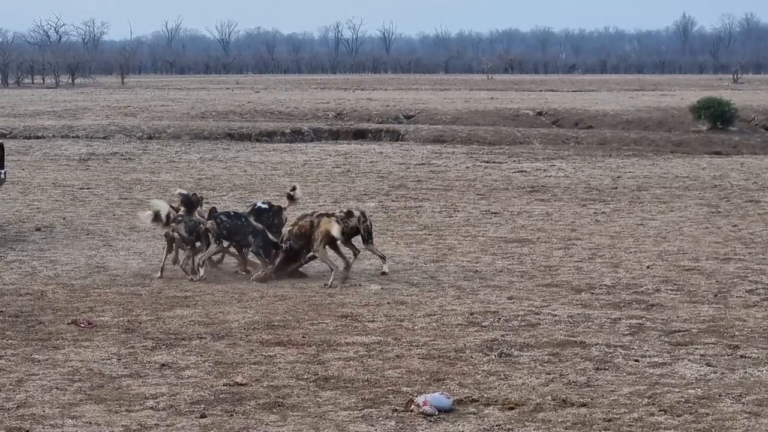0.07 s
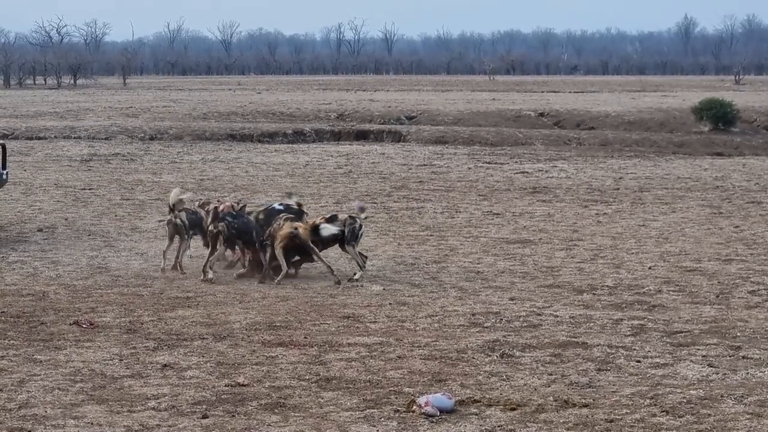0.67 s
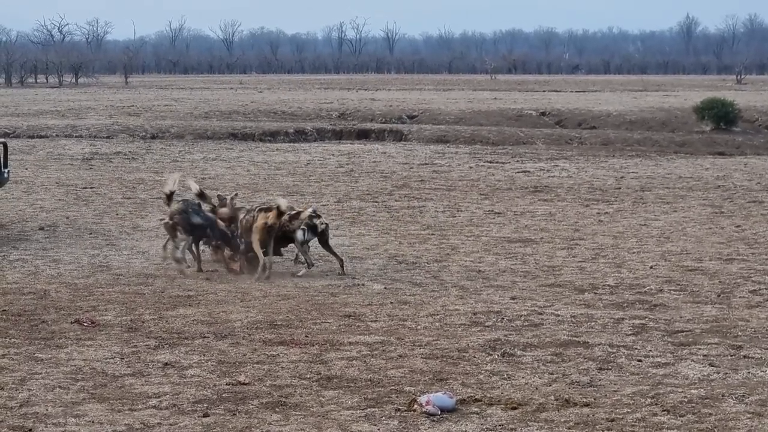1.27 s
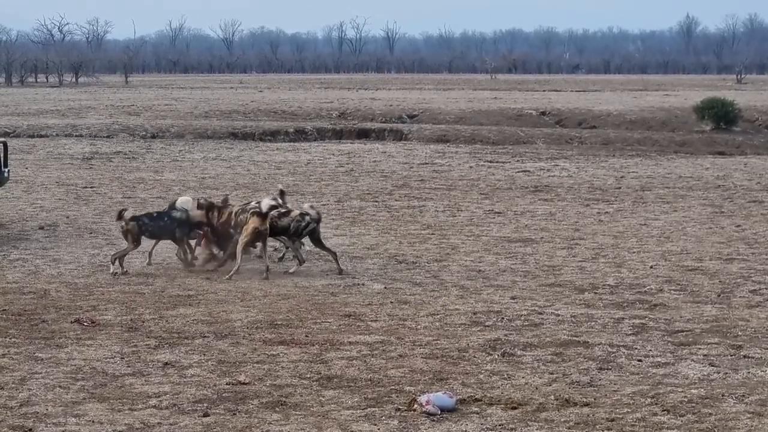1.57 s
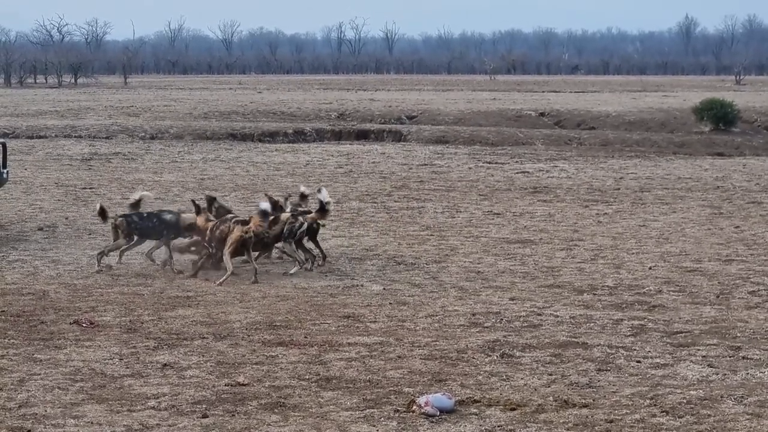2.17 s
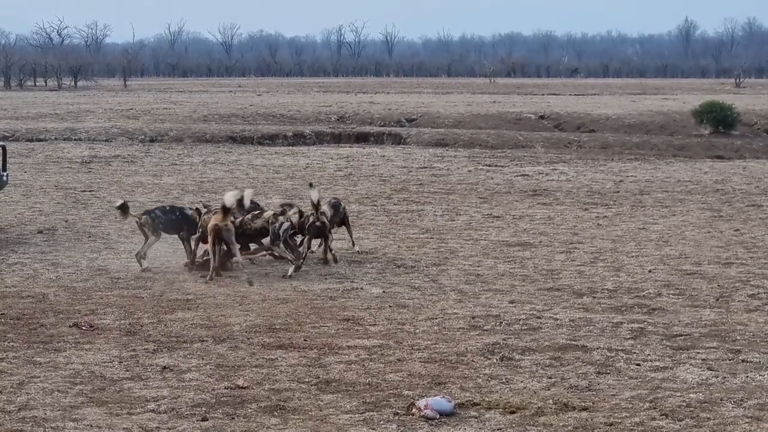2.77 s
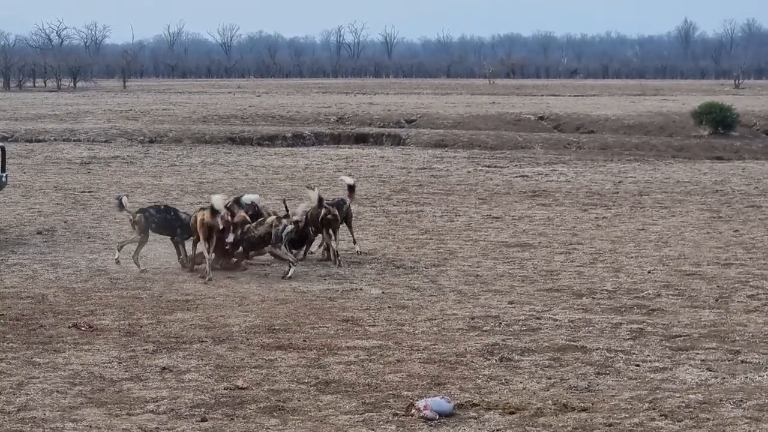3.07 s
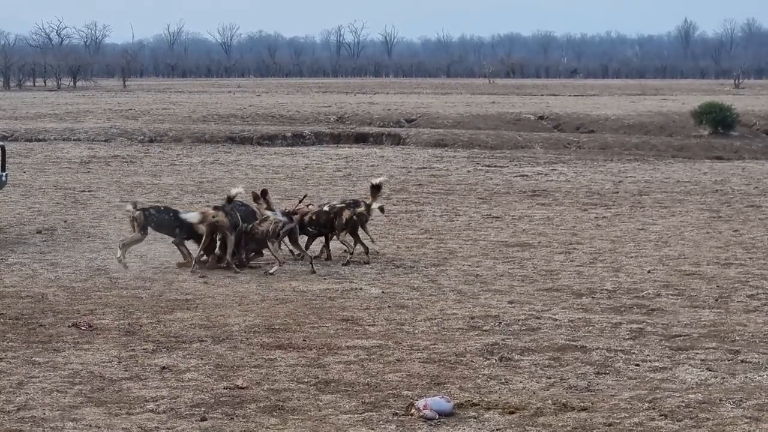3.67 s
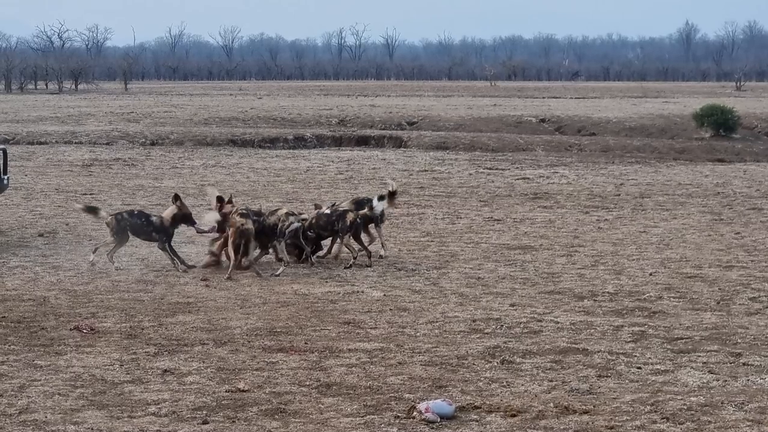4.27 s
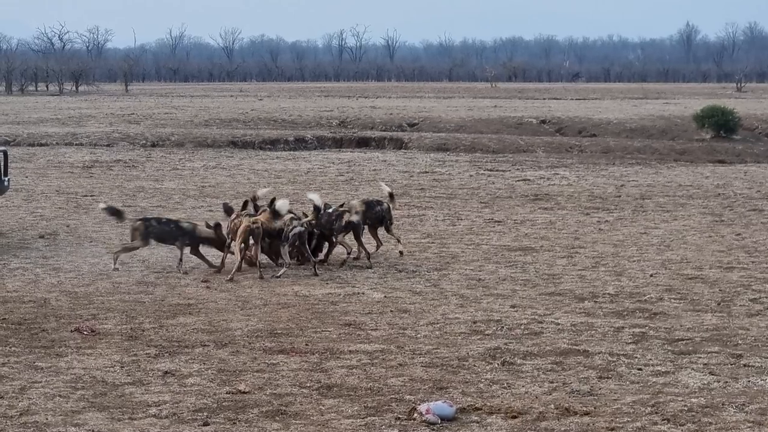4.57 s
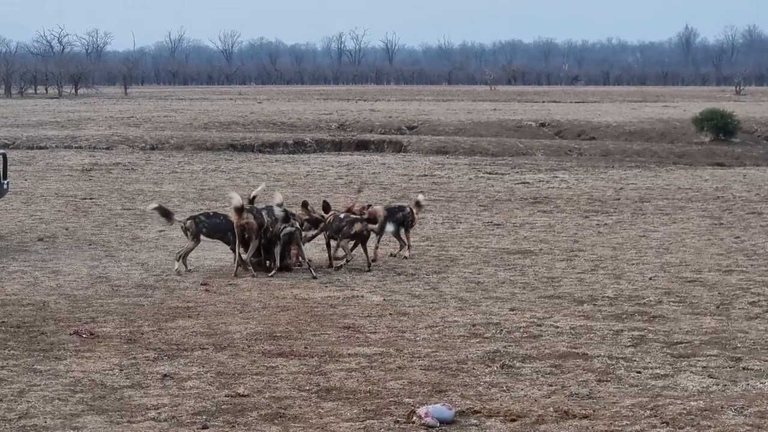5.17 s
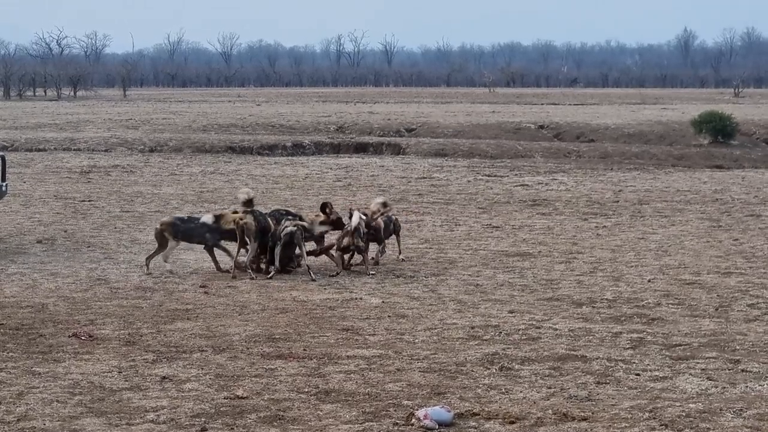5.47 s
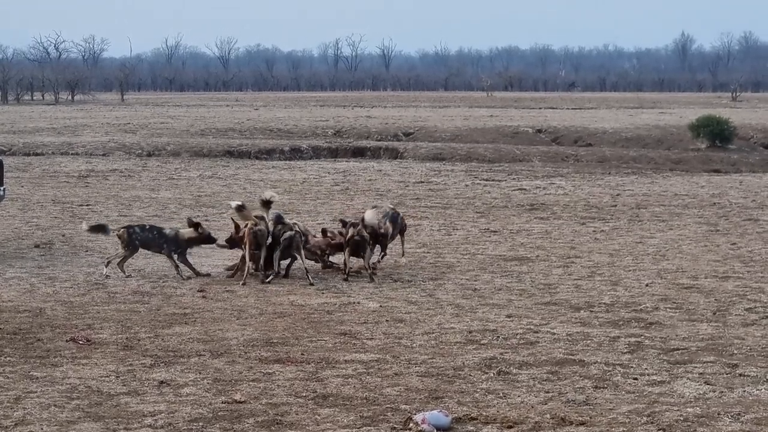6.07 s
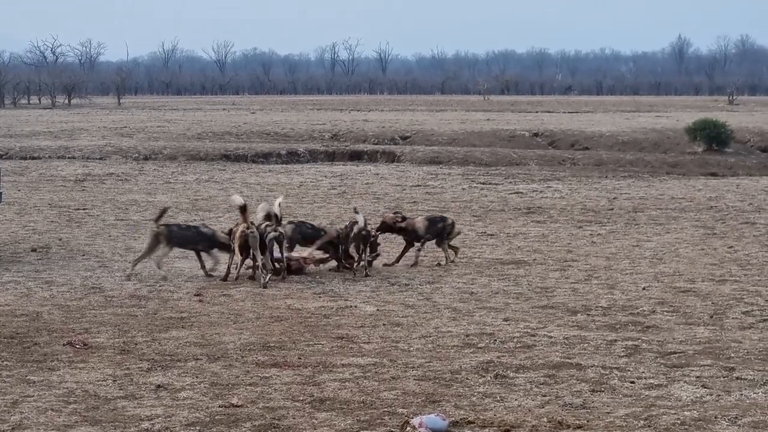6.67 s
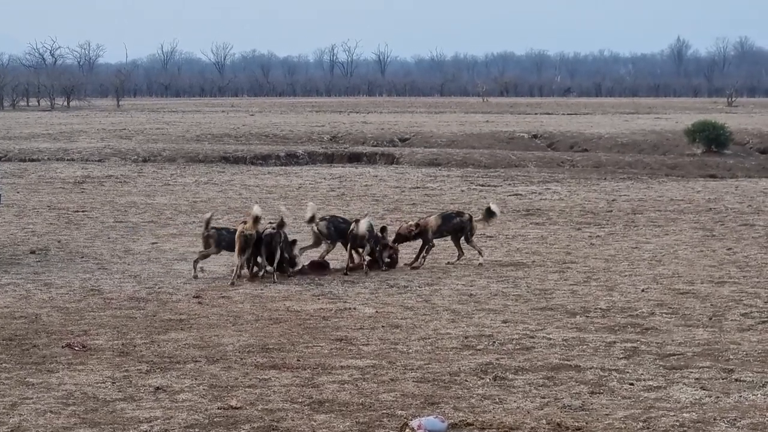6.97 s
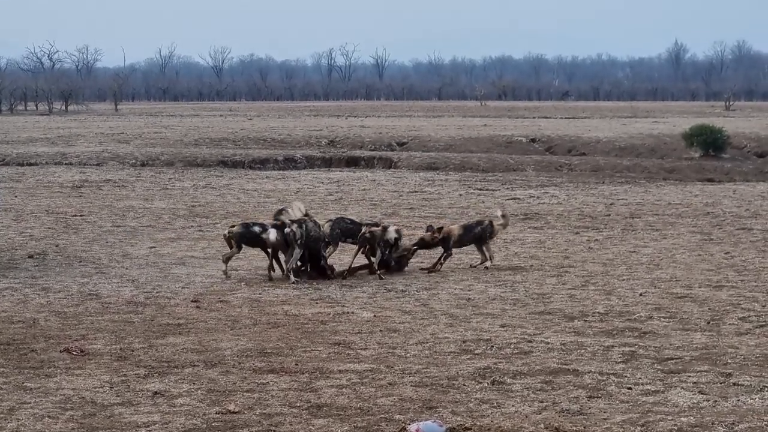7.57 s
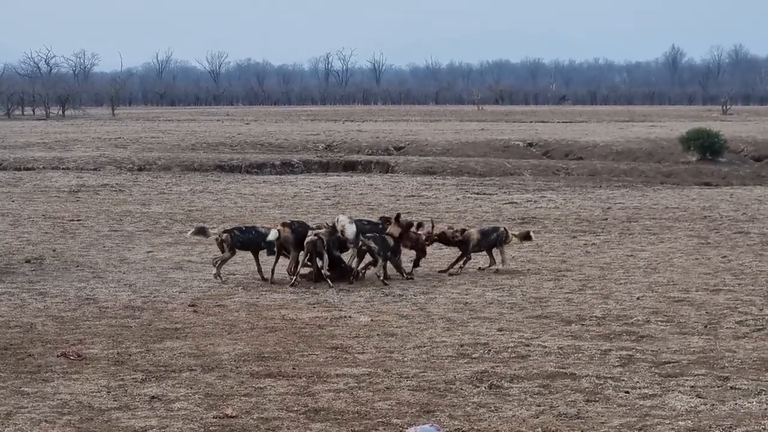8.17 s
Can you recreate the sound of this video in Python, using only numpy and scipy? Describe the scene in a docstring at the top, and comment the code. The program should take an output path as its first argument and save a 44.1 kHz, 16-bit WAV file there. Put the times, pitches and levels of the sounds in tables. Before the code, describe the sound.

A pack of wild dogs feeds some way off on open grassland, giving quick bursts of very high, birdlike twittering. A loud, thin squeal stands out early, with another near the middle and a brief one toward the end. Underneath, paws scuff and thud in dry grass, jaws snap and stalks crack faintly. Light wind rumbles on the microphone, gusting a little more at the close.

```python
"""Wild dogs at a carcass.

A pack tugs at a carcass on dry open grassland, some way off. Thin vibrating membranes give
near-sine voices: fast twittering swoops, arched squeals, hoarse yips, faint moans.
Jaws snap, paws thud, scuff and rasp in the straw, stalks crack. Light wind rumbles on the microphone."""
import sys
import numpy as np
from scipy import signal
from scipy.fft import rfft, irfft
from scipy.io import wavfile
from scipy.ndimage import uniform_filter1d

SR = 44100
rng = np.random.default_rng(int(sys.argv[2]) if len(sys.argv) > 2 else 0)


def log_audio(samples):
    """Write samples as a 16-bit WAV file to the path given in sys.argv[1]."""
    # one column per channel
    frames = np.atleast_2d(samples).T
    # limit to full scale, then quantise
    limited = np.clip(frames, -1, 1)
    pcm = np.round(limited * 32767).astype(np.int16)
    wavfile.write(sys.argv[1], SR, pcm)


N = 367353
TIME_S = np.arange(N) / SR
CUTOFF_HZ = 15850


def from_db(db):
    """Decibels to gain."""
    return 10 ** (np.asarray(db) / 20)


def unit_rms(x):
    """Scale to unit power."""
    return x / np.sqrt(np.mean(x ** 2) + 1e-20)


def in_time(rows, t=TIME_S):
    """Columns of a curve at times t."""
    times, *columns = np.transpose(rows)
    return [np.interp(t, times, column) for column in columns]


def at_hz(points, hz):
    """Interpolate a spectrum over log frequency."""
    points_hz, values = np.transpose(points)
    return np.interp(np.log(hz), np.log(points_hz), values)


def add(track, start_s, sound):
    """Mix a sound into a track from start_s on."""
    i = max(0, int(start_s * SR))
    track[i:i + len(sound)] += sound[:N - i]


def drift(rate_hz, size=N):
    """Smooth random curve of unit spread."""
    knots = rng.standard_normal(size // 20 + 2)
    return np.interp(np.arange(size) * rate_hz / SR, np.arange(len(knots)), knots) * np.sqrt(3 / 2)


def resonate(x, hz, *widths_hz):
    """Unity-peak resonators in series, one per width."""
    for width_hz in widths_hz:
        r = np.exp(-np.pi * width_hz / SR)
        feedback = [1, -2 * r * np.cos(2 * np.pi * hz / SR), r * r]
        x = signal.lfilter(np.array([1, 0, -1]) * (1 - r * r) / 2, feedback, x + 1e-18)
    return x


def swells(rows, bed_db, steepness):
    """Level/dB of a bed plus rounded swells (centre/s, length/s, level/dB)."""
    power = from_db(bed_db) ** 2 + np.zeros(N)
    for centre_s, length_s, db in rows:
        t = np.arange(-min(centre_s, 2 * length_s), 2 * length_s, 1 / SR)
        add(power, centre_s + t[0], from_db(db) ** 2 * np.exp(-np.abs(2 * t / length_s) ** steepness))
    return 10 * np.log10(power)


def place(x, pan_db, lead_ms):
    """Off-centre source; positive values make the left louder and earlier."""
    hz = np.arange(N + 1) * SR / (2 * N)
    left = irfft(rfft(x, 2 * N) * np.exp(2j * np.pi * hz * lead_ms / 1000))[:N]
    return np.array([left, x]) * from_db([[pan_db / 2], [-pan_db / 2]])


def field(x, scatter_db, decay_s, far_db, far_decay_s=.16):
    """Rough ground scatters a brief diffuse tail, the plain a faint long one."""
    t = np.arange(0, .6, 1 / SR)
    decays_s = np.array([[[decay_s]], [[far_decay_s]]])
    tails = rng.standard_normal((2, 2, len(t))) * np.exp(-t / decays_s) * (t > .002)
    near, far = tails / np.sqrt(np.sum(tails ** 2, axis=-1, keepdims=True))
    return x + signal.fftconvolve(x, from_db(scatter_db) * near + from_db(far_db) * far, axes=1)[:, :N]


def echoed(x, delay_s=.002333, echo_db=-18.5):
    """One surface near the microphone combs the spectrum."""
    echo = np.array([np.interp(TIME_S - delay_s, TIME_S, side, left=0) for side in x])
    return x + from_db(echo_db) * echo


# Surroundings: f/Hz, width/Hz, gain/dB
REFLECTION_BANDS = [(541, 58, 6), (1578, 111, -9.5), (1882, 130, -14), (4150, 310, 4)]

def coloured(x):
    """Nearby reflections add peaks and dips."""
    for hz, width_hz, db in REFLECTION_BANDS:
        x = x + (from_db(db) - 1) * resonate(x, hz, width_hz)
    return x


# Stereo field: f/Hz, left-right correlation/1
COHERENCE = [(60, 0.79), (500, 0.91), (1400, 0.034), (10000, 0.051)]

def banded_noise(spectrum, flicker_db, flicker_hz, coherence=COHERENCE):
    """Unit-rms stereo noise in half-octave bands that flicker partly together."""
    out, shared = 0, drift(flicker_hz)
    edges_hz = 20 * 2 ** np.arange(0, 10.1, .5)
    white = rng.standard_normal((2, 2, N))
    for k, (low, high) in enumerate(zip(edges_hz, edges_hz[1:])):
        hz, own = np.sqrt(low * high), drift(flicker_hz)
        if high < spectrum[0][0] or low > spectrum[-1][0]:
            continue
        band = signal.butter(2, [low, high], "band", fs=SR, output="sos")
        mid, side = signal.sosfilt(band, white[k % 2])
        alike = at_hz(coherence, hz)
        gain = from_db(at_hz(spectrum, hz) + flicker_db * (shared + .42 * own))
        out = out + gain * (np.sqrt(1 + alike) * mid + np.sqrt(1 - alike) * side * [[1], [-1]])
    return unit_rms(out)


# Ambient air: f/Hz, relative density/dB
AIR_SPECTRUM = [(25, -25), (50, 2), (80, -12), (160, -24.5), (1200, -29), (2500, -28.5), (4400, -34),
                (7500, -41), (9500, -54)]

def air():
    """Faint hush of still air all round."""
    spectrum = AIR_SPECTRUM + [(CUTOFF_HZ, AIR_SPECTRUM[-1][1])]
    return from_db(-58) * banded_noise(spectrum, flicker_db=2, flicker_hz=18)


# Rumble: f/Hz, relative density/dB
WIND_SPECTRUM = [(22, -1.5), (50, 0), (74, 10), (100, -6.5), (135, -30), (230, -27.5), (330, -61)]
# Breeze: t/s, relative level/dB
BREEZE_CURVE = [(0, -68), (1.1, -62), (1.7, -42.5), (4.0, -43.5), (8.33, -51)]
# Gusts: centre/s, length/s, relative level/dB
WIND_GUSTS = [(1.2, 0.056, -34.5), (1.79, 0.053, -29.5), (1.99, 0.059, -30.5), (2.75, 0.86, -40.5),
              (3.47, 0.17, -36.5), (4.35, 0.18, -36), (6.79, 0.028, -33), (7.21, 0.046, -32.5),
              (7.87, 0.19, -34.5), (8.17, .12, -27), (8.29, 0.057, -26.5)]

def wind():
    """A breeze rises after a second; gusts buffet the microphone ports."""
    level_db = swells(WIND_GUSTS, in_time(BREEZE_CURVE)[0], steepness=3.1)
    rumble = banded_noise(WIND_SPECTRUM, flicker_db=2.9, flicker_hz=28, coherence=[(30, .2), (200, .2)])
    return from_db(level_db - 1.5) * rumble * from_db([[-2.4], [2.4]])


# Scuffs: centre/s, length/s, relative soil level/dB, straw over soil/dB
PAW_SCUFFS = [(0.13, 0.38, -50, -9.5), (0.283, 0.035, -46, -8.5), (0.674, 0.13, -51, -8.5),
              (0.962, 0.14, -54, -13), (1.244, .17, -52.5, -4), (1.874, 0.51, -59, 0),
              (2.627, 0.2, -56.5, -3), (3.269, .15, -60, -0.5), (3.728, 0.27, -54, -19),
              (4.035, 0.21, -59, -4), (4.363, 0.14, -58, 1.5), (5.075, 0.2, -57.5, -1.5),
              (5.414, 0.13, -59.5, 1), (5.702, 0.049, -57, 2.5), (5.812, 0.043, -51, -9),
              (6.322, 0.18, -51, -4.5), (6.614, 0.16, -69, 8.5), (7.313, 0.41, -65.5, 5),
              (8.154, 0.38, -59.5, -2.5)]

def scuff_levels():
    """Soil and straw levels: bracing paws and the dragged carcass over constant shuffling."""
    soil = [(s, length_s, db) for s, length_s, db, _ in PAW_SCUFFS]
    straw = [(s, length_s, db + over_db) for s, length_s, db, over_db in PAW_SCUFFS]
    return swells(soil, bed_db=-64.5, steepness=2.2), swells(straw, bed_db=-69, steepness=4.1)


# Rubbed soil and straw: f/Hz, relative density/dB
SOIL_SPECTRUM = [(150, -18.5), (280, -0.5), (550, -4), (1200, 2), (2000, -23.5), (4000, -40.5)]
STRAW_SPECTRUM = [(1000, -9), (2000, -1.5), (4400, 1.5), (5700, -3.5), (7800, -7.5), (9500, -22),
                  (15500, -16)]

def scuffle(soil_db, straw_db):
    """Paws and carcass rub dull soil and hissing straw."""
    soil = from_db(soil_db - 4.5) * banded_noise(SOIL_SPECTRUM, flicker_db=4.5, flicker_hz=35)
    straw = from_db(straw_db - 3) * banded_noise(STRAW_SPECTRUM, flicker_db=3, flicker_hz=35)
    return soil + straw


def burst(t, decay_s, grain_db):
    """A contact breaks into a fast-dying crowd of tiny cracks."""
    grains = rng.standard_normal(len(t)) * from_db(grain_db * drift(1200, len(t)))
    return unit_rms(grains) * t * np.exp(-t / decay_s)


def scrapes(straw_db, per_s=140):
    """Straw and grit crunch under paws: short rasps around a wandering pitch."""
    out, t = np.zeros(N), np.arange(0, .06, 1 / SR)
    wander = drift(14)
    for when, pitch, size in rng.random((int(per_s * N / SR), 3)):
        i = int(when * N)
        hz = 2700 * 2 ** np.clip(.35 * wander[i] + 1.8 * (pitch - .5), -1.3, 1)
        scrape = resonate(burst(t, decay_s=.003, grain_db=4), hz, hz * .2, hz * .8)
        add(out, when * N / SR, unit_rms(scrape) * from_db(straw_db[i] - 15 + 10 * size ** 2))
    return out


def cracks(per_s=17, weakest_db=-57.5):
    """Dry stalks break underfoot at random, most faintly."""
    out, t = np.zeros(N), np.arange(0, .02, 1 / SR)
    for when, pitch, size in rng.random((int(per_s * N / SR), 3)):
        crack = resonate(burst(t, decay_s=.00094, grain_db=3.5), 2500 * 2 ** pitch, 4200)
        add(out, when * N / SR, from_db(weakest_db + 10 * size ** 2) * crack / np.abs(crack).max())
    return out


# Knocks: t/s, relative peak/dB, ring f/Hz
KNOCKS = [(.644, -45, 596), (1.406, -41.5, 597), (2.099, -41, 542), (2.426, -43, 595), (2.644, -50, 3640),
          (3.142, -46, 342), (3.6, -42.5, 860), (4.233, -48.5, 454), (4.689, -50.5, 1300),
          (5.447, -50, 2860), (6.631, -51.5, 1200)]

def thuds():
    """Soft blows of paws, bodies and bones, one damped ring each."""
    out, t = np.zeros(N), np.arange(0, .08, 1 / SR)
    for s, peak_db, hz in KNOCKS:
        ring = resonate(burst(t, decay_s=.0032, grain_db=5.5), hz, 128, 640)
        add(out, s - .002, from_db(peak_db + 2.5) * ring / np.abs(ring).max())
    return out


# Snap resonances, one list each for low, mid, top: f/Hz, width/Hz, relative level/dB
SNAP_RESONANCES = [
    [(988, 220, -3.5), (1220, 200, -4.5)],
    [(1820, 310, -7.5), (2270, 670, 3.5), (4000, 1700, 8)],
    [(7960, 4500, 12), (12000, 11000, 4.5)],
]
# Snaps and clicks: t/s, decay/s, low level/dB, mid level/dB, top level/dB
SNAPS_AND_CLICKS = [(1.104, 0.0014, -65, -39.5, -55), (3.146, 0.0022, -60, -52.5, -62),
                    (3.975, 0.0035, -60.5, -60, -46.5), (4.056, 0.0031, -56, -47, -46),
                    (4.397, 0.0021, -55, -42, -56), (5.682, .0022, -51, -66, -75),
                    (5.697, 0.0021, -46.5, -49, -72), (5.779, 0.0041, -51, -58.5, -70),
                    (5.969, 0.0025, -75, -51.5, -57.5), (6.4, 0.004, -40, -53, -78),
                    (7.033, 0.0016, -52, -55, -68), (7.451, .0017, -46.5, -42, -67),
                    (7.616, 0.0014, -48, -47.5, -53), (8.235, .0017, -47, -51.5, -57),
                    (8.271, 0.0031, -58, -52.5, -58.5)]

def snaps_and_clicks():
    """Sharp bursts ring broad resonances: jaws, crunching bone or stalks, a twitter's clicking onset."""
    out, t = np.zeros(N), np.arange(0, .08, 1 / SR)
    for s, decay_s, *ranges_db in SNAPS_AND_CLICKS:
        for range_db, modes in zip(ranges_db, SNAP_RESONANCES):
            crack = burst(t, decay_s, grain_db=4)
            rings = sum(from_db(db) * unit_rms(resonate(crack, hz, width_hz, width_hz))
                        for hz, width_hz, db in modes)
            peak_rms = np.sqrt(uniform_filter1d(rings ** 2, size=220).max())  # loudest 5 ms
            add(out, s - .002, from_db(range_db) * rings / peak_rms)
    return out


def voice(t, hz, db, jitter, order=1):
    """One near-sine partial, as of a thin membrane; more pitch jitter also breaks up the level."""
    hz = order * uniform_filter1d(hz, size=130) * (1 + jitter * drift(1300, len(t)))
    fade = np.clip(np.minimum(t - t[0], t[-1] - t) / .0024, 0, 1)
    shimmer = unit_rms(from_db(np.minimum(300 * jitter, 4) * drift(300, len(t))))
    tone = np.sqrt(2) * np.sin(2 * np.pi * np.cumsum(hz) / SR) * (hz < SR / 2)
    return fade * from_db(db) * shimmer * tone


def glides(rows, jitter):
    """Notes that swell and sink while the pitch slides."""
    out = np.zeros(N)
    for start_s, length_s, from_hz, to_hz, db in rows:
        t = np.arange(0, length_s, 1 / SR)
        hz = from_hz + (to_hz - from_hz) * t / length_s
        add(out, start_s, np.sqrt(np.sin(np.pi * t / length_s)) * voice(t, hz, db, jitter))
    return out


# Moans: t/s, length/s, start f/Hz, end f/Hz, level/dB
MOAN_NOTES = [(0.024, 0.39, 277.4, 278.6, -64.5), (.03, 0.26, 569, 555, -64), (.96, 0.2, 278.6, 247.6, -64),
              (3.76, 0.259, 221, 189, -55)]

def moans():
    """Faint low voices, slightly rough."""
    return glides(MOAN_NOTES, jitter=.028)


# Yips and rasps: t/s, length/s, start f/Hz, end f/Hz, level/dB
YIPS_AND_RASPS = [(.825, 0.081, 4700, 5440, -65), (1.148, 0.023, 2444, 2220, -48.5),
                  (1.65, 0.046, 3520, 3930, -56.5), (2.37, 0.076, 4390, 5170, -58),
                  (2.71, .049, 4530, 5450, -61), (5.79, 0.059, 1754, 1420, -58),
                  (6.3, 0.088, 4600, 4000, -59), (6.42, 0.15, 3560, 5440, -62.5),
                  (7.308, 0.034, 2700, 2625, -49.5)]

def yips_and_rasps():
    """Faint hoarse yips and resonant scuffing rasps: heavily jittered glides."""
    return glides(YIPS_AND_RASPS, jitter=.0754)


# Squeals, one curve each: t/s, f/Hz, fundamental level/dB, octave level/dB
SQUEAL_CURVES = [
    [(1.695, 2386, -40, -71), (1.715, 2466, -22.5, -46), (1.748, 2494, -20.5, -60), (1.764, 2529, -20, -38),
     (1.79, 2509, -19.5, -42.5), (1.82, 2402, -23.5, -44), (1.843, 2430, -22, -38.5),
     (1.858, 2410, -36, -47), (1.874, 2290, -21.5, -41), (1.895, 2230, -25, -30), (1.92, 2244, -28, -42),
     (1.94, 2150, -48.5, -79)],
    [(2.446, 2210, -40.5, -49), (2.464, 2405, -37, -40.5), (2.48, 2290, -41, -56), (2.492, 2250, -53, -69)],
    [(2.52, 2460, -49, -73), (2.536, 2340, -47, -54), (2.545, 2205, -35, -53), (2.556, 2100, -46, -62)],
    [(3.728, 2224, -37, -57), (3.745, 2270, -33.5, -51.5), (3.756, 2360, -33, -32),
     (3.785, 2394, -30.5, -28.5), (3.82, 2360, -47.5, -45.5), (3.872, 2234, -24.5, -41),
     (3.897, 2206, -37.5, -40.5), (3.93, 2155, -28, -26.5), (3.961, 2151, -36.5, -25.5),
     (3.969, 2050, -44.5, -41), (3.988, 2150, -53, -64)],
    [(7.223, 2170, -59, -50), (7.23, 2126, -36.5, -37.5), (7.273, 2112, -37.5, -33),
     (7.292, 2073, -45, -34.5), (7.297, 1960, -68, -42), (7.303, 2000, -54, -58)],
]

def squeals(waver=.002, waver_hz=55, flutter_db=2.2, weak_db=16, short_s=.06):
    """Arched cries, clear at full effort, rough where weak or too brief to settle."""
    fundamentals, overtones = np.zeros((2, N))
    for curve in SQUEAL_CURVES:
        t = np.arange(curve[0][0], curve[-1][0], 1 / SR)
        hz, fundamental_db, octave_db = in_time(curve, t)
        effort_db = np.maximum(fundamental_db, octave_db)
        weakness = np.clip((effort_db.max() - effort_db) / weak_db, 0, 1)
        jitter = .001 + .009 * weakness ** 2 + .008 * (t[-1] - t[0] < short_s)
        hz = hz * (1 + waver * drift(waver_hz, len(t)) + .5 * jitter * drift(2 * waver_hz, len(t)))
        add(fundamentals, t[0], voice(t, hz, fundamental_db, jitter))
        for order, offset_db in enumerate([0, -33, -39], 2):
            db = octave_db + offset_db + flutter_db * drift(2 * waver_hz, len(t))
            add(overtones, t[0], voice(t, hz, db, jitter + .001 * (order - 1), order))
    # shorter waves are shaded more on the left
    return place(fundamentals, pan_db=0, lead_ms=-.08) + place(overtones, pan_db=-5, lead_ms=.024)


def scoop(progress, from_hz, turn_hz, to_hz, dwell_power=2.8):
    """Pitch over progress 0..1: rush to the turn, dwell, rush away."""
    come, go = np.abs([from_hz - turn_hz, to_hz - turn_hz]) ** (1 / dwell_power)
    away = come * (1 - progress) - go * progress
    direction = np.sign(np.where(away > 0, from_hz, to_hz) - turn_hz)
    return turn_hz + direction * np.abs(away) ** dwell_power


# Twitters: t/s, length/s, start f/Hz, turn f/Hz, end f/Hz, level/dB
TWITTER_NOTES = [ (0.14, 0.03, 8360, 8340, 9600, -51), (0.572, 0.041, 8500, 8400, 11000, -59),
                 (.603, 0.031, 9100, 6950, 7600, -45), (0.638, 0.029, 7500, 7850, 7700, -43.5),
                 (0.663, 0.013, 7900, 7500, 7200, -35), (0.68, 0.042, 7360, 6830, 7200, -49.5),
                 (0.716, 0.029, 7100, 6760, 7600, -48.5), (0.748, 0.018, 7340, 7650, 7700, -46),
                 (1.08, 0.039, 8300, 11400, 8600, -64), (1.109, .023, 8300, 7430, 9500, -45.5),
                 (1.134, 0.023, 10200, 12300, 11900, -52), (1.178, 0.023, 13600, 6720, 7000, -48),
                 (1.22, 0.033, 6900, 6920, 7100, -42), (1.265, 0.035, 7180, 6830, 7000, -52.5),
                 (1.318, 0.034, 8330, 7770, 7500, -59), (1.631, .031, 7940, 7100, 9200, -49.5),
                 (1.661, 0.031, 11100, 11550, 12000, -55.5), (1.932, 0.03, 7430, 6830, 7720, -47),
                 (1.975, 0.029, 8950, 7750, 7650, -52.5), (2.378, .033, 8800, 7440, 13500, -56),
                 (2.551, 0.032, 7200, 6700, 7000, -55.5), (2.602, 0.022, 7830, 7970, 7100, -40.5),
                 (2.628, 0.053, 7300, 6800, 8000, -46.5), (3.127, 0.029, 7640, 7680, 8630, -53),
                 (3.988, 0.034, 6850, 6830, 9500, -56), (4.022, .045, 10700, 6650, 7000, -48.5),
                 (4.078, .024, 8200, 7650, 7530, -52), (4.682, 0.024, 8050, 7390, 8680, -44.5),
                 (6.635, .018, 8600, 8600, 13200, -55), (6.653, 0.046, 13300, 7080, 8000, -46),
                 (6.715, 0.037, 8800, 7090, 8600, -42), (6.741, 0.015, 8300, 10900, 8300, -42.5),
                 (6.756, .011, 7430, 7100, 7100, -49), (7.029, 0.026, 8260, 7480, 15800, -40),
                 (7.07, 0.027, 15600, 14700, 15700, -50), (7.126, .034, 14200, 11650, 12700, -65),
                 (7.157, 0.069, 12500, 12700, 13500, -63), (7.303, 0.013, 8100, 6800, 7000, -40.5),
                 (7.318, 0.014, 6600, 7030, 7300, -36), (7.341, .032, 9000, 7780, 7650, -46.5)]

def twitters(attack_s=.003, release_s=.0013, sag_db_per_s=73, flick_db_per_octave=4,
             stutter_db=2.6, stutter_hz=330, rest_hz=7300):
    """Stuttering whistles over a throaty rasp; most scoop to near 7 kHz, hoarser when forced higher."""
    out = np.zeros(N)
    for start_s, length_s, from_hz, turn_hz, to_hz, level_db in TWITTER_NOTES:
        t = np.arange(0, length_s, 1 / SR)
        hz = scoop(t / length_s, from_hz, turn_hz, to_hz)
        db = level_db - sag_db_per_s * (t - length_s / 2) - flick_db_per_octave * np.log2(hz / turn_hz)
        envelope = np.clip(np.minimum(t / attack_s, (length_s - t) / release_s), 0, 1)
        envelope *= unit_rms(from_db(stutter_db * drift(stutter_hz, len(t))))
        strain = np.clip(np.log2(hz / rest_hz), 0, 1)
        whistle = voice(t, hz, db, jitter=.007 + .012 * strain)
        low_pitch_gate = np.clip((7400 - hz) / 400, 0, 1)
        octave = low_pitch_gate * voice(t, hz, db - 23, jitter=.007, order=2)
        rasp = from_db(db - 22) * unit_rms(resonate(rng.standard_normal(len(t)), 2650, 710, 5000))
        hiss = from_db(db - 15) * unit_rms(resonate(rng.standard_normal(len(t)), 13000, 5000, 5000))
        add(out, start_s, envelope * (whistle + octave + rasp + strain * hiss))
    return out


def scene():
    """Pack slightly right, air all round, wind on the microphone."""
    chatter = place(twitters() + yips_and_rasps(), pan_db=-4, lead_ms=-.025)
    calls = field(chatter, scatter_db=-3.5, decay_s=.01, far_db=-31.5)
    calls += field(squeals(), scatter_db=-13.5, decay_s=.008, far_db=-37)
    calls += moans()
    soil_db, straw_db = scuff_levels()
    blows = snaps_and_clicks() + thuds() + cracks() + coloured(scrapes(straw_db))
    blows = field(place(blows, pan_db=-1.5, lead_ms=.035), scatter_db=-11, decay_s=.012, far_db=-24)
    bed = coloured(scuffle(soil_db, straw_db) + air()) * from_db([[-.8], [.8]])
    return calls + echoed(blows + bed) + wind()


def record(dry):
    """Steep low-pass."""
    return signal.sosfilt(signal.ellip(12, .1, 80, CUTOFF_HZ, fs=SR, output="sos"), dry)


dry = scene()
out = record(dry)
log_audio(out)
```